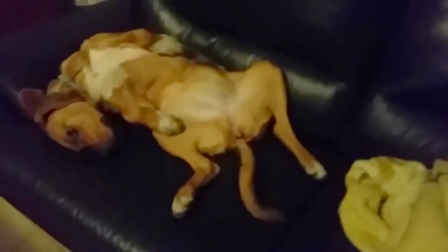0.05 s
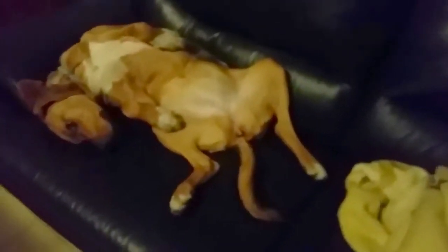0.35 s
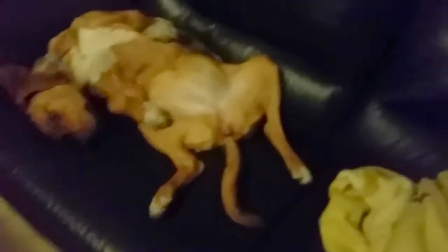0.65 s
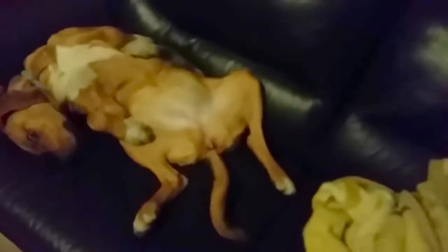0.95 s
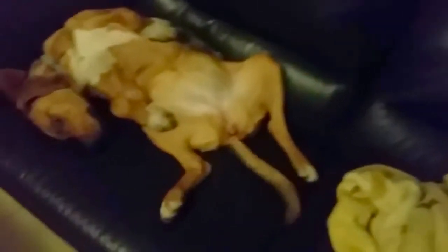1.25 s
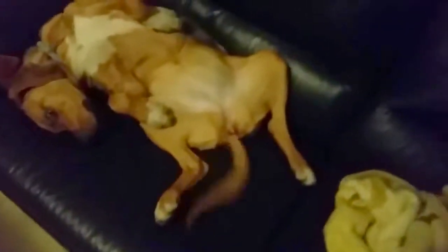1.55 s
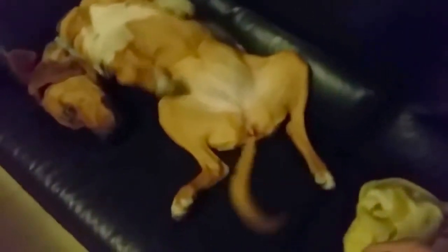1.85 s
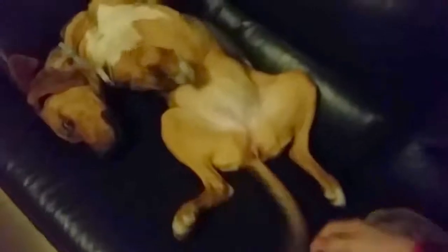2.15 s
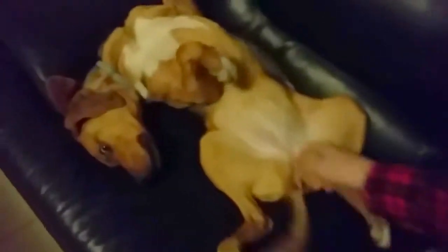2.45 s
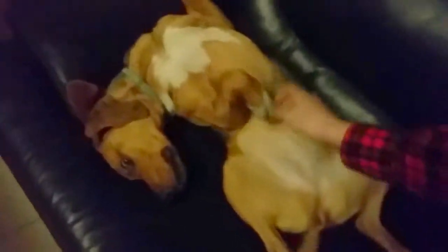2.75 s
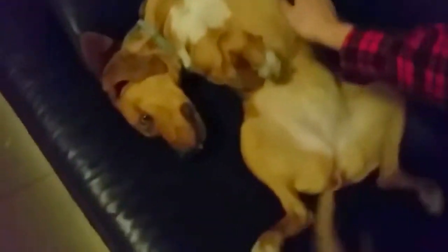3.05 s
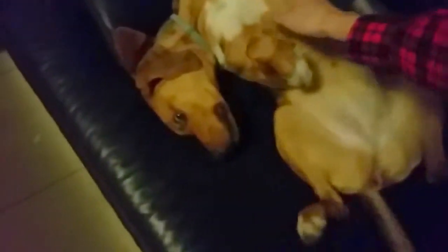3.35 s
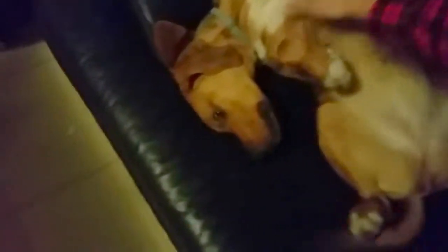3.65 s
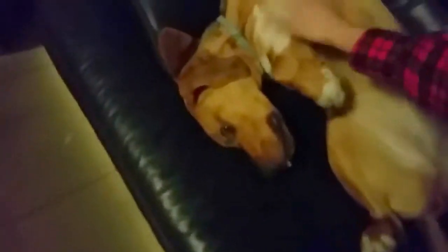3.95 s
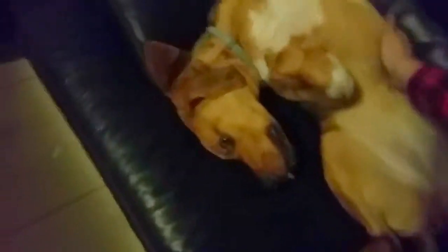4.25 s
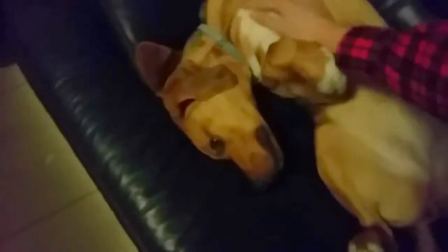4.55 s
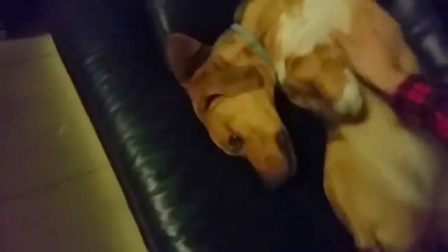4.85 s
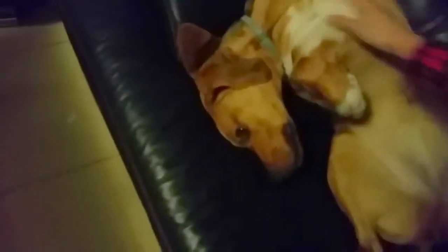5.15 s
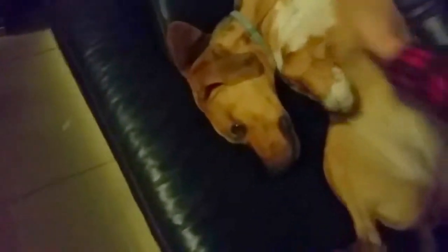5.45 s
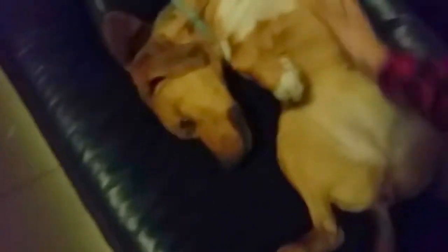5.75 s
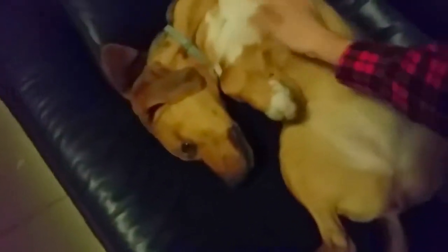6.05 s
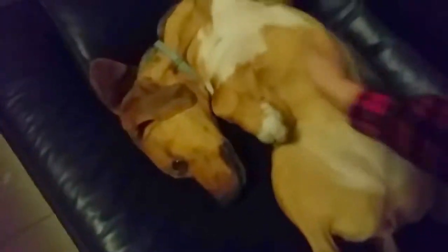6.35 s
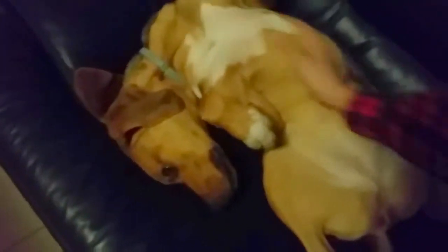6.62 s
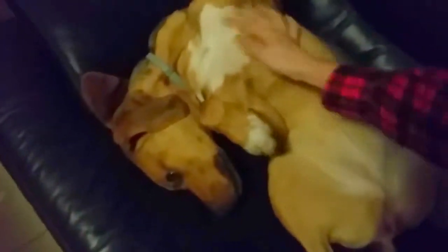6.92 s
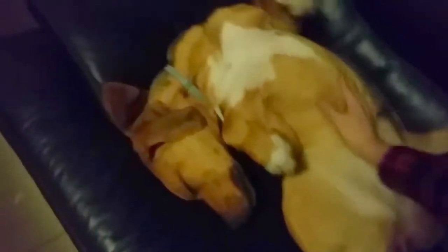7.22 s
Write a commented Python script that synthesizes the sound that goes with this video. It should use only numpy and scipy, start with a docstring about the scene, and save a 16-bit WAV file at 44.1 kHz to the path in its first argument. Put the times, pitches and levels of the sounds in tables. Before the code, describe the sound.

In a quiet living room, a dog's wagging tail thumps dully on a leather sofa cushion. A joint cracks as someone leans in, then a hand and sleeve rub over the dog's coat in quick, soft swishes. The thumps die away and the stroking continues more lightly. A few small plastic ticks come from the phone held above the sofa, over faint room rumble and hiss.

```python
"""Petting a dog on a leather sofa

A dog lies on its back in a quiet living room, its wagging tail slapping and bouncing the cushion.
Someone leans in with a crack of a joint and strokes its chest: fur hisses, sleeve and leather rub,
and the sofa creaks. A phone's case ticks in the other hand, over faint room tone and microphone hiss."""
import sys
import numpy as np
from scipy import signal
from scipy.fft import rfft, irfft, next_fast_len
from scipy.io import wavfile
from scipy.ndimage import uniform_filter1d

SR = 44100
rng = np.random.default_rng(int(sys.argv[2]) if len(sys.argv) > 2 else 0)


def unload_wav(signal):
    """Save mono or channel-first audio to the path in sys.argv[1] as 16-bit WAV at rate SR, clipped to [-1, 1]."""
    wavfile.write(
        sys.argv[1],
        SR,
        np.round(np.clip(np.atleast_2d(signal).T, -1, 1) * 32767).astype(np.int16),
    )


N = 329900
TIME = np.arange(N) / SR


def undb(db):
    """Decibels to gain."""
    return 10 ** (np.asarray(db) / 20)


def unit(x):
    """Scale to rms 1."""
    return x / np.sqrt(np.mean(x ** 2))


def pan(db):
    """Stereo gains for a level difference, left minus right."""
    return undb(np.array([[db], [-db]]) / 2)


def add(out, s, x):
    """Mix a short sound in at s seconds."""
    i = int(s * SR)
    out[..., i:i + x.shape[-1]] += x[..., :out.shape[-1] - i]


def band(x, hz, kind, order=2):
    """Butterworth filter."""
    sos = signal.butter(order, np.minimum(hz, SR / 2 - 1), kind, fs=SR, output="sos")
    return signal.sosfilt(sos, x)


def colour(x, curve):
    """Shape by an EQ curve of (frequency [Hz], gain [dB]) points; rms 1."""
    hz, db = np.transpose(curve)
    size = next_fast_len(x.shape[-1], True)
    gain = undb(np.interp(np.log(np.fft.rfftfreq(size, 1 / SR) + 1), np.log(hz), db))
    return unit(irfft(rfft(x, size) * gain, size)[..., :x.shape[-1]])


def spread(pair, alike_hz):
    """Two noises as two microphones hear a diffuse sound: alike in the bass, unrelated above."""
    mid = pair[0] + (np.sqrt(2) - 1) * band(pair[0], alike_hz, "low", order=1)
    side = band(pair[1], alike_hz, "high", order=1)
    return np.array([mid + side, mid - side]) / np.sqrt(2)


def wander(rate_hz):
    """Smooth random drift; rms 1."""
    hold = int(SR / rate_hz)
    steps = np.repeat(rng.standard_normal(N // hold + 1), hold)
    return unit(uniform_filter1d(steps, hold)[:N])


def ring(modes, size, detune=0.):
    """Damped modes answer one blow; detune makes each blow land a little differently."""
    t = np.arange(size) / SR
    shifts = 1 + detune * rng.standard_normal(len(modes))
    return sum(undb(db) * np.cos(2 * np.pi * hz * shift * t) * np.exp(-np.log(1000) * t / t60)
               for (hz, db, t60), shift in zip(modes, shifts))


def slips(body, gap_s, count):
    """A contact gives way in a few quick slips, each ringing the body; unit energy."""
    out = np.zeros(len(body))
    for s in (np.arange(count) + rng.random(count) / 2) * gap_s:
        add(out, s, rng.uniform(0.35, 1) * body)
    return out / np.linalg.norm(out)


def grains(uneven_db, grain_samples=32):
    """Friction as a dense stereo stream of tiny catches of uneven size."""
    sizes = undb(uneven_db * np.minimum(rng.exponential(size=N // grain_samples + 1), 5))
    return rng.standard_normal((2, N)) * np.repeat(sizes, grain_samples)[:N]


# the living room's reverb decay: (frequency [Hz], t60 [s])
REVERB_DECAY = [(100, 0.53), (500, 0.45), (2000, 0.72), (6000, 0.98), (15000, 0.12)]

def reverb(x, predelay_s=0.0078, build_s=0.0026):
    """The room's diffuse reflections, dying away octave by octave."""
    t = np.arange(SR * 2 // 3) / SR
    spectrum = rfft(spread(rng.standard_normal((2, len(t))), alike_hz=510))
    hz, t60 = np.transpose(REVERB_DECAY)
    bin_octave = np.log2(np.clip(np.fft.rfftfreq(len(t), 1 / SR), 64, 16384))
    tail = 0
    for octave in range(6, 15):
        noise = irfft(spectrum * np.maximum(1 - abs(bin_octave - octave), 0), len(t))
        tail += noise * np.exp(-np.log(1000) * t / np.interp(octave, np.log2(hz), t60))
    tail *= np.clip((t - predelay_s) / build_s, 0, 1)
    return signal.fftconvolve(x[None], unit(tail) / np.sqrt(len(t)), axes=1)[:, :N]


# the low bed of the quiet room: (frequency [Hz], gain [dB])
ROOM_TONE_EQ = [(20, -5.5), (35, -23), (52, -3.5), (85, -1), (150, -6), (250, -6), (370, -12), (600, -16),
                (1200, -20), (2500, -24.5), (5000, -30.5), (9000, -49)]
# mains hum: (frequency [Hz], level [dB])
MAINS_HUM = [(53.8, -71)]

def room_tone(tone_db=-65.5):
    """The room's faint rumble and mains hum, each wavering slightly in level."""
    rumble = colour(spread(rng.standard_normal((2, N)), alike_hz=252), ROOM_TONE_EQ)
    rumble *= undb(tone_db + .5 * wander(9.7))
    hum = sum(undb(db + 2 * wander(3.9)) * np.sin(2 * np.pi * hz * TIME) for hz, db in MAINS_HUM)
    return rumble + hum


# the left microphone's extra band of hiss: (frequency [Hz], gain [dB])
LEFT_HISS_EQ = [(5000, -37), (6200, -3), (6900, 0), (8400, 0), (9400, -8), (10200, -10.5), (12000, -28)]

def microphone_hiss(hiss_db=-72.5, left_db=-71.5, whine_db=-77.5, whine_hz=9087):
    """Both microphones hiss, the left one more and with a thin whine."""
    hiss = undb(hiss_db) * rng.standard_normal((2, N))
    whine = undb(whine_db + 1.5 * wander(12)) * np.sin(2 * np.pi * whine_hz * TIME + wander(4.5) / 2)
    hiss[0] += undb(left_db) * colour(rng.standard_normal(N), LEFT_HISS_EQ) + whine
    return hiss


# creak cues: (time [s], relative level [dB], pitch [Hz], length [s])
CREAK_CUES = [(2.6365, -55.5, 2100, 0.00346), (6.6, -63, 1600, 0.029), (6.774, -59.5, 686, 0.0157)]

def leather_creaks(gain_db=-12, t60=0.0035, count=6):
    """The leather sticks and slips a few times under the dog's weight."""
    out = np.zeros(N)
    for s, db, hz, length in CREAK_CUES:
        creak = slips(ring([(hz, 0, t60)], size=4096), gap_s=length / count, count=count)
        add(out, s, undb(db + gain_db) * unit(band(creak, [hz / 2, hz * 1.37], "band")))
    return out * pan(-11.0)


# fader ride for the dog's body sliding on the sofa: (time [s], level [dB])
SLIDE_FADER = [(1.3, -72), (2.05, -66.5), (2.15, -54), (2.28, -56.5), (2.42, -67.5), (3.0, -64.5),
               (3.8, -61), (4.3, -60.5), (4.45, -65), (5.0, -71)]
# the dull rub of leather: (frequency [Hz], gain [dB])
LEATHER_EQ = [(100, -10.5), (350, -4), (750, -4), (1200, -10), (2500, -17), (6000, -25.5)]

def body_slide():
    """The dog squirms, its back rubbing unevenly over the leather."""
    level_db = np.interp(TIME, *np.transpose(SLIDE_FADER), left=-120, right=-120)
    friction = colour(spread(grains(uneven_db=0.7), alike_hz=760), LEATHER_EQ)
    return friction * undb(level_db + 1.57 * wander(35))


def cupped_hand(x, delay_s=0.000693, drift=0.312, echo_gain=0.44):
    """The hollow under a moving hand adds a short, shifting reflection; rms 1."""
    samples = np.arange(N)
    delayed = samples - SR * delay_s * np.exp(drift * wander(6))
    echo = np.array([np.interp(delayed, samples, channel) for channel in x])
    return unit(x + echo_gain * echo)


# sweeps of the arm, about four a second once it pets:
# (midpoint [s], length [s], sleeve and skin rub [dB], hair and fibre hiss [dB])
STROKE_CUES = [(0.257, .14, -72, -88), (1.392, 0.072, -66.5, -71), (1.596, 0.31, -61.5, -69),
               (1.788, 0.23, -56, -81), (2.07, .18, -57, -64), (2.306, 0.16, -63, -74),
               (2.474, .09, -58, -73), (2.528, .1, -53.5, -57), (2.725, 0.23, -61.5, -68),
               (2.901, .12, -51.5, -55), (3.074, 0.13, -64, -61.5), (3.17, 0.12, -61.5, -65),
               (3.275, 0.16, -51.5, -57), (3.489, 0.23, -57.5, -60), (3.777, 0.27, -56.5, -58.5),
               (4.007, 0.31, -62, -59.5), (4.285, 0.29, -54.5, -60), (4.559, 0.28, -61, -61.5),
               (4.832, 0.26, -65.5, -69.5), (5.03, 0.24, -71.5, -81), (5.313, 0.25, -74, -71),
               (5.615, 0.21, -72.5, -71), (5.846, 0.29, -73.5, -80), (6.13, .2, -74, -73.5),
               (6.328, 0.23, -72, -74), (6.573, 0.21, -73, -77), (6.754, 0.24, -68.5, -74),
               (6.995, .18, -70.5, -70), (7.218, 0.27, -71.5, -71.5), (7.476, 0.23, -70, -68)]
# the midrange rub of sleeve and skin: (frequency [Hz], gain [dB])
RUB_EQ = [(100, -1.5), (250, -9), (550, -6), (1050, -0.5), (1500, -5), (2200, -2.5), (3800, -8.5),
          (6000, -15.5), (10000, -25.5), (16000, -24)]
# the bright swish of the coat: (frequency [Hz], gain [dB])
COAT_EQ = [(2000, -13), (3700, 3), (6000, -0.5), (9000, 0.5), (12000, -2.5), (16000, -10.5)]
# the airy hiss of flicked hairs: (frequency [Hz], gain [dB])
FUR_EQ = [(3000, -13), (6000, -12), (9000, -5), (12000, -0.5), (15500, 0.5)]

def petting(hand_lands_s=2.4, drag_rub_db=-62.5, drag_fur_db=-71.5, coat_db=-50, coat_growth=0.24):
    """The sleeve moves in; then each stroke rubs sleeve and skin over the coat and flicks the hairs."""
    # the sleeve drags on between strokes while the arm leans in: start, attack, hold, release [s]
    drag = np.interp(TIME, np.cumsum([1.15, 0.96, 2.04, 0.69]), [0, 1, 1, 0])
    rub_gain, fur_gain, coat_gain = undb(drag_rub_db) * drag, undb(drag_fur_db) * drag, np.zeros(N)
    for middle_s, length_s, sleeve_db, hairs_db in STROKE_CUES:
        # the hand speeds up and slows down, at rest at both turning points
        speed = np.cos(np.pi * np.clip((TIME - middle_s) / length_s, -.5, .5)) ** 1.5
        rub_gain = np.hypot(rub_gain, undb(sleeve_db) * speed)
        fur_gain = np.hypot(fur_gain, undb(hairs_db) * speed)
        # even a light stroke swishes over the coat; under pressure the hair hiss grows faster
        if middle_s > hand_lands_s:
            coat_gain = np.hypot(coat_gain, undb(coat_db + coat_growth * hairs_db) * speed)
    catch = wander(70)  # the hand never slides evenly
    friction = colour(spread(grains(uneven_db=2), alike_hz=850), RUB_EQ)
    rub = cupped_hand(friction) * rub_gain * undb(0.5 + 1.57 * catch)
    coat = colour(grains(uneven_db=1.3), COAT_EQ) * coat_gain
    fur = colour(grains(uneven_db=1.8), FUR_EQ) * fur_gain * undb(2.0 * catch)
    return rub * pan(0.53) + coat * pan(-1.8) + fur * pan(-5.0)


# joint crack cues: (time [s], relative level [dB])
CRACK_CUES = [(1.666, -44), (1.715, -25)]
# the woody snap of a joint: (frequency [Hz], gain [dB])
JOINT_EQ = [(300, -16), (800, -10), (1100, -7.5), (1430, 3.5), (1850, -11), (2300, -2.5), (3500, -11.5),
            (4800, -21), (7500, -45), (15000, -54)]

def joint_cracks(gain_db=14, echo_s=0.0079, echo_db=-7, reverb_db=-3, dull_hz=5000):
    """A joint cracks further off, thrown back by the floor and then by the whole room."""
    close, send = np.zeros(N), np.zeros(N)
    snap = colour(signal.unit_impulse(1024, 32), JOINT_EQ)
    for s, db in CRACK_CUES:
        gain = undb(db + gain_db)
        crack = gain * slips(snap, gap_s=0.000867, count=4)
        add(close, s - .001, crack)
        add(close, s + echo_s, undb(echo_db) * band(crack, 3000, "low"))
        add(send, s, gain * snap / np.linalg.norm(snap))
    return close * pan(1.5) + undb(reverb_db) * reverb(band(send, dull_hz, "low"))


# handling tick cues: (time [s], relative level [dB], body trim [dB], treble trim [dB], pan left [dB])
TICK_CUES = [(0.071, -44, -32, -20, -12.5), (0.191, -45.5, -23, -25, -6), (3.515, -28, -16.5, -22, -9.5),
             (4.408, -26, -19, -9.5, -10.5), (4.862, -42.5, -38, -11, -8), (6.109, -49.5, -32, -24, -18),
             (6.456, -42, -14.5, -20, -9.5), (6.86, -31, -13.5, -17, -13)]
# the plastic ring of the phone case: (frequency [Hz], level [dB], t60 [s])
CASE_MODES = [(520, -31, 0.012), (870, 5, 0.053), (1170, -1, 0.017), (1500, 8.5, 0.022), (1880, 7.5, 0.022),
              (2650, 2.5, 0.017), (3720, 6, 0.0071), (4700, 0.5, 0.0069), (6020, 2, 0.0081),
              (7920, 7, 0.0056), (13600, -19, .002)]

def case_ticks(gain_db=10, low_db=17, high_db=10, scrape_db=2, scrape_s=0.0028, reverb_db=-19):
    """The plastic case gives under the fingers with a tiny scrape, nearest the right microphone."""
    out, t = np.zeros((2, N)), np.arange(4096) / SR
    for s, db, body_db, treble_db, pan_db in TICK_CUES:
        scrape = undb(scrape_db) * rng.standard_normal(len(t)) * np.exp(-t / scrape_s)
        shell = ring(CASE_MODES, size=len(t), detune=0.038) + scrape
        # where the finger presses sets the share of low and high modes
        low = undb(body_db + low_db) * band(shell, [450, 1200], "band")
        mid = band(shell, [1100, 4800], "band")
        high = undb(treble_db + high_db) * band(shell, 5170, "high", order=4)
        tick = slips(low + mid + high, gap_s=.00035, count=3)
        left, right = undb(db + gain_db) * pan(pan_db) * tick
        add(out[0], s, left)
        add(out[1], s - .0004, right)  # reaches the nearer microphone first
    return out + undb(reverb_db) * reverb(out.mean(axis=0))


# tail hits on the cushion: (time [s], level [dB], slap hardness [dB])
THUMP_CUES = [(1.412, -39.5, -34.5), (1.848, -23.5, -22.5), (1.97, -42, -23), (2.343, -25, -22),
              (2.544, -37, -31), (2.736, -21, -12.5), (2.914, -36, -32.5), (3.092, -23.5, -9),
              (3.161, -26, -25), (3.31, -36.5, -25), (3.497, -24.5, -9), (3.597, -34, -30),
              (3.811, -45, -36), (4.024, -24.5, -11.5), (4.115, -35, -34.5), (4.596, -28.5, -10),
              (7.216, -50, -8)]
# the cushion's dead bounce sinks in pitch as the dog rolls its weight over: (time [s], pitch [Hz])
BOUNCE_PITCH = [(1.85, 129.5), (2.74, 115.4), (4.6, 104)]
# the cushion's short ring and the room's lingering low resonances: (frequency [Hz], level [dB], t60 [s])
CUSHION_AND_ROOM_MODES = [(97.7, -10.5, 0.22), (82.7, -17.5, 0.43), (152, -21, 0.25), (195, -38, 0.11),
                          (234, -19.5, 0.07), (238.8, -24.5, 0.3), (329.7, -26.5, 0.25), (394, -32.5, 0.27),
                          (517, -6.5, 0.014)]

def tail_thumps(bounce_t60=0.054, push_hz=900, hardening=0.35,
                slap_db=-2, slap_s=0.0055, slap_lead_s=0.00246, reverb_db=-6):
    """The tail slaps the leather, then bounces the cushion and rings the room's low resonances."""
    out, t = np.zeros(N), np.arange(SR // 2) / SR
    for s, db, hard_db in THUMP_CUES:
        bounce_hz = np.interp(s, *np.transpose(BOUNCE_PITCH))
        boom = ring([(bounce_hz, 0, bounce_t60), *CUSHION_AND_ROOM_MODES], size=len(t), detune=0.027)
        # a harder blow is a shorter push, so it rings brighter
        bounce = band(boom, push_hz * undb(hardening * hard_db), "low", order=4)
        noise = band(rng.standard_normal(len(t)), [280, 900], "band")
        slap = band(noise, 1000, "low") * np.exp(-t / slap_s)
        add(out, s, undb(db) * bounce / np.abs(bounce).max())
        add(out, s - slap_lead_s, undb(db + hard_db + slap_db) * slap / np.abs(slap).max())
    out = band(out, 70, "high", order=3)
    return out * pan(1.0) + undb(reverb_db) * reverb(out)


def scene():
    """The full mix, heard from above the sofa."""
    hits = tail_thumps() + case_ticks() + leather_creaks() + joint_cracks()
    rubs = petting() + body_slide()
    bed = room_tone() + microphone_hiss()
    return hits + rubs + bed


def record(dry, top_hz=15850):
    """The phone cuts the top end steeply."""
    return signal.sosfilt(signal.ellip(10, .2, 70, top_hz, fs=SR, output="sos"), dry)


dry = scene()
out = record(dry)
unload_wav(out)
```